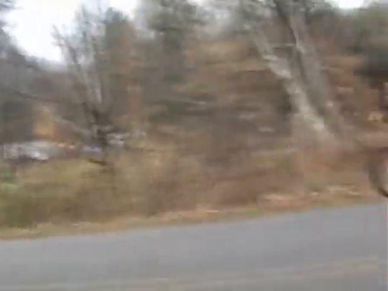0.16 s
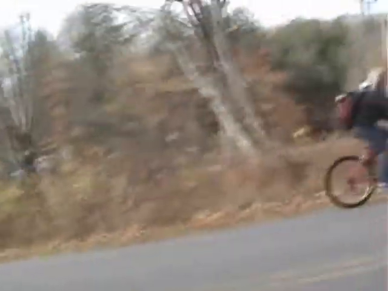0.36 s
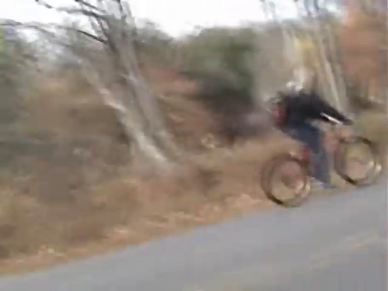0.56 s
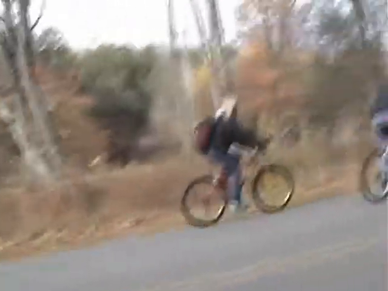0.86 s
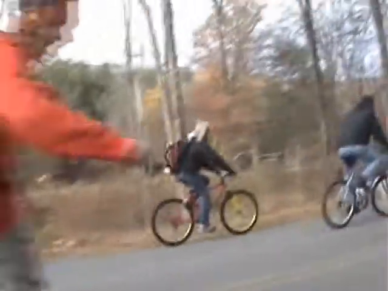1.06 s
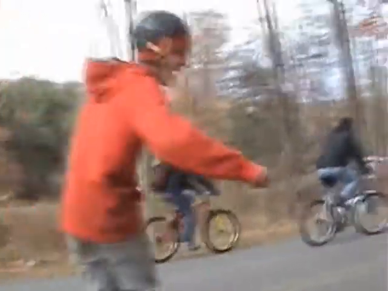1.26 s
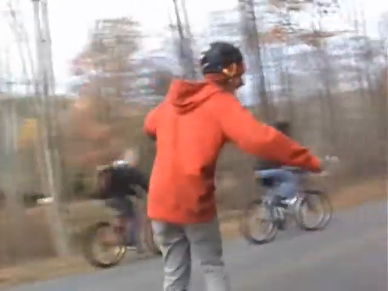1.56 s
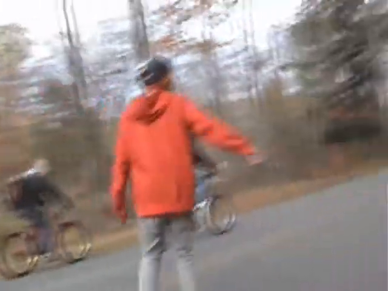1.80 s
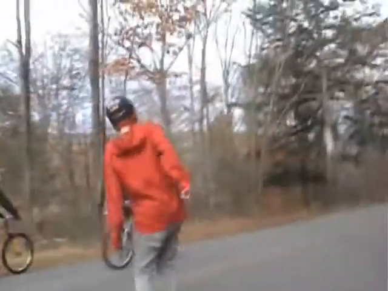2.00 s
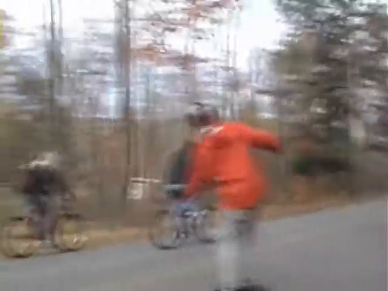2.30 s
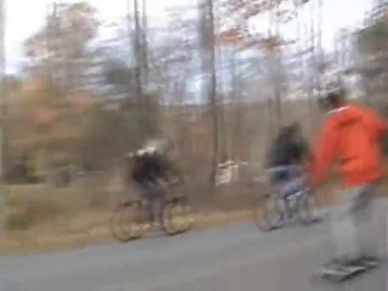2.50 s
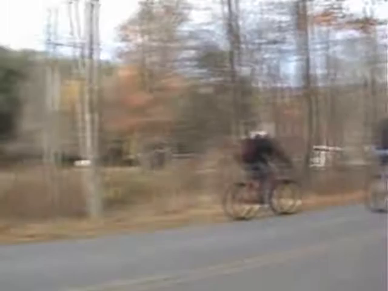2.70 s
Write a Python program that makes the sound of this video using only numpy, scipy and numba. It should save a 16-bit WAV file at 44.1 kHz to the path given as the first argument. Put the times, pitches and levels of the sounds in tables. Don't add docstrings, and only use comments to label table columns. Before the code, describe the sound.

A shoe sole drags and squeals roughly on asphalt as a longboard brakes, then wheels rumble on

```python
import sys
import numpy as np
from scipy import signal
from scipy.fft import rfft, irfft, next_fast_len
from scipy.io import wavfile
from scipy.ndimage import uniform_filter1d
from numba import njit

SR = 44100
rng = np.random.default_rng(int(sys.argv[2]) if len(sys.argv) > 2 else 0)


def voltage_ratio(level):
    return 10 ** (np.asarray(level, float) / 20)


def materialize(psi):
    bounded = np.clip(np.atleast_2d(psi).T, -1, 1)
    quanta = np.round(bounded * 32767).astype(np.int16)
    wavfile.write(sys.argv[1], SR, quanta)


N = 125685


def rms_one(x):
    return x / np.sqrt(np.mean(x ** 2) + 1e-20)


def in_time(rows):
    s, *columns = np.transpose(rows)
    return [np.interp(np.arange(N) / SR, s, c) for c in columns]


def at_hz(points, hz):
    point_hz, value = np.transpose(points)
    return np.interp(np.log(hz), np.log(np.maximum(point_hz, 1)), value)


def bump(s, length_s):
    return np.exp(-.5 * ((np.arange(N) / SR - s) / length_s) ** 2)


def drift(rate_hz):
    r = np.exp(-80 * np.pi * rate_hz / SR)
    noise = rng.standard_normal(N // 40 + 2002)
    slow = signal.lfilter([1], [1, -2 * r, r * r], noise)[2000:]
    return np.interp(np.arange(N) / 40, np.arange(len(slow)), rms_one(slow))


def band_pass(x, low_hz, high_hz, order=2):
    return signal.sosfilt(signal.butter(order, [low_hz, high_hz], "band", fs=SR, output="sos"), x)


@njit
def sweep(x, cosine, r):
    y = np.zeros(len(x))
    for i in range(2, len(x)):
        y[i] = x[i] - x[i - 2] + 2 * r * cosine[i] * y[i - 1] - r * r * y[i - 2]
    return y


def resonate(x, hz, width_hz):
    cosine = np.cos(2 * np.pi * hz / SR) * np.ones(N)
    r = np.exp(-np.pi * width_hz * 1.55 / SR)
    return rms_one(sweep(sweep(x, cosine, r), cosine, r))


def steady(x, share=.3):
    power = uniform_filter1d(x ** 2, size=200)
    return rms_one(x / (power + .05) ** (share / 2))


def ring(clicks, hz, t60_s):
    r, w = voltage_ratio(-60 / (t60_s * SR)), 2 * np.pi * hz / SR
    return signal.lfilter([0, np.sin(w)], [1, -2 * r * np.cos(w), r * r], clicks + 1e-18)


def grains(per_s, spread_db):
    sizes = voltage_ratio(spread_db * np.minimum(rng.exponential(1, N), 4)) * rng.choice([-1, 1], N)
    hits = rng.random(N) < per_s / SR
    return rms_one(sizes * hits) + .5 * rng.standard_normal(N)


def colour(x, spectrum, patchy_db, likeness=None):
    out, together = 0, drift(9.0)
    edges_hz = 25 * 2 ** np.arange(0, 9.6, .5)
    for k, (low_hz, high_hz) in enumerate(zip(edges_hz, edges_hz[1:])):
        band = band_pass(x[k % 2], low_hz, high_hz)
        hz = np.sqrt(low_hz * high_hz)
        if likeness:
            alike = at_hz(likeness, hz)
            band = np.sqrt(1 + alike) * band[0] + np.sqrt(1 - alike) * band[1] * [[1], [-1]]
        flicker_db = patchy_db * (together + 0.59 * drift(6.0))
        out = out + voltage_ratio(at_hz(spectrum, hz) + flicker_db) * band
    return rms_one(out)


SPREAD_DB, RIGHT_LAG_RAD = -21.5, 0.33


def place(x, pan_db):
    smear = voltage_ratio(SPREAD_DB) * (np.roll(x, 211) - np.roll(x, 367) + np.roll(x, 631))
    quadrature = signal.hilbert(x, next_fast_len(N))[:N].imag
    late = np.cos(RIGHT_LAG_RAD) * x + np.sin(RIGHT_LAG_RAD) * quadrature
    half_db = pan_db / 2 + np.zeros(N)
    return np.array([x + smear, late - smear]) * voltage_ratio([half_db, -half_db])


# hz, level_db_per_hz
AIR_SPECTRUM = [(15, -41), (25, -8), (216, -6), (246, -2.5), (514, -7), (687, -9.5), (804, -9.5),
                (3160, -16.5), (13400, -38)]
# hz, likeness_0_1
AIR_LIKENESS = [(25, 0.77), (60, 0.7), (240, 0.7), (950, 0.52), (3770, 0.41), (15000, 0.62)]
# hz, width_hz, level_db
DRONES = [(124.5, 10, -46.5), (185, 220, -55)]
# hz, width_hz, level_db
CHAIN = [(5100, 270, -60.5), (6600, 490, -58)]
AIR_DB, AIR_PATCHY_DB, CHAIN_PER_S = -37, 0.9, 79
MOTOR_HZ, MOTOR_DB, MOTOR_FROM_S = 248.4, -43, 2.06


def air():
    since_s = np.arange(N) / SR - MOTOR_FROM_S
    far = sum(voltage_ratio(db + 0.38 * drift(2.2)) * resonate(rng.standard_normal(N), hz, width_hz)
              for hz, width_hz, db in DRONES)
    motor = np.sqrt(2) * np.sin(2 * np.pi * np.cumsum(MOTOR_HZ + 0.7 * drift(4.4)) / SR)
    far += voltage_ratio(MOTOR_DB + 0.7 * drift(2.3)) * np.clip(since_s / 0.12, .15, 1) * motor
    ticks = (rng.random(N) < CHAIN_PER_S / SR) * rng.uniform(0.53, 1, N) + 1e-9
    chain = sum(voltage_ratio(db) * resonate(ticks, hz, width_hz) for hz, width_hz, db in CHAIN)
    far += chain * np.clip(since_s / 0.14, 0, 1)
    rush = colour(rng.standard_normal((2, 2, N)), AIR_SPECTRUM, AIR_PATCHY_DB, AIR_LIKENESS)
    return voltage_ratio(AIR_DB) * rush + place(far, 0.25)


# s, level_db
ROLL = [(0, -38.5), (.7, -30.5), (1.45, -33), (1.73, -32), (1.8, -28), (1.9, -35), (2.07, -33),
        (2.15, -40.5), (2.5, -42.5), (2.7, -42), (2.85, -38)]
# hz, level_db_per_hz
WHEEL_SPECTRUM = [(88, -43), (150, -0.5), (349, -7), (549, -6), (1540, -16.5), (1930, -15), (2420, -23.5),
                  (5440, -25), (13400, -39.5)]
# hz, width_hz, level_db
DECK = [(418, 238, -2.5), (675, 117, -9)]
ROLL_PAN_DB, TREBLE_HZ, TREBLE_SMOOTH_S = 2, 3000, .5


def wheels():
    db, = in_time(ROLL)
    out = colour([grains(2500, 4.6), grains(2500, 3.3)], WHEEL_SPECTRUM, patchy_db=2.0)
    treble = signal.sosfilt(signal.butter(2, TREBLE_HZ, "high", fs=SR, output="sos"), out)
    smooth_db = uniform_filter1d(db, size=int(TREBLE_SMOOTH_S * SR))
    out += treble * (voltage_ratio(smooth_db - db) - 1)
    out += sum(voltage_ratio(level_db + 0.5 * drift(9.1)) * resonate(grains(1500, 5.6), hz, width_hz)
               for hz, width_hz, level_db in DECK)
    return place(voltage_ratio(db) * out, ROLL_PAN_DB)


NOTE_STEADY = .7
# peak_s, level_db, length_s, pitch_hz, left_right_db
CHIRPS = [
    (1.64, -39, .012, 1920, 1),
    (1.683, -34, 0.0085, 1900, 1),
    (1.739, -39, .005, 1870, 0),
    (1.76, -36, 0.008, 1860, 0),
    (1.869, -38, 0.017, 2240, 0),
    (2.236, -47.5, 0.069, 2160, 11),
    (2.24, -47.5, 0.071, 1730, 10),
    (2.794, -45.5, 0.036, 1780, 8),
    (2.813, -45.5, 0.087, 2000, 14),
]
CHIRP_WIDTH_HZ = 170


def chirps():
    out = 0
    for s, level_db, length_s, hz, pan_db in CHIRPS:
        tone = steady(resonate(rng.standard_normal(N), hz, CHIRP_WIDTH_HZ), NOTE_STEADY)
        out = out + place(voltage_ratio(level_db + 2.1 * drift(30)) * bump(s, length_s) * tone, pan_db)
    return out


# s, peak_db
KNOCKS = [(1.753, -11.5), (1.775, -16), (1.782, -23), (1.792, -12), (1.808, -20.5), (1.822, -23),
          (1.836, -21), (1.846, -27), (2.497, -21.5), (2.651, -21), (2.82, -24)]
# hz, level_db, t60_s
KNOCK_MODES = [(313, -12, 0.081), (500, -8, 0.027), (665, 8, 0.031), (950, -14, 0.021), (1310, 1.5, 0.022),
               (2300, 2, 0.0076)]
KNOCK_DB, KNOCK_SPREAD_DB = -11, 1.5


def knocks():
    s, db = np.transpose(KNOCKS)
    out = np.zeros(N)
    chance_db = rng.normal(0, KNOCK_SPREAD_DB, (len(s), len(KNOCK_MODES)))
    for k, (hz, level_db, t60_s) in enumerate(KNOCK_MODES):
        clicks = np.zeros(N)
        clicks[(s * SR).astype(int)] = voltage_ratio(db + level_db + KNOCK_DB + chance_db[:, k])
        out += ring(clicks, hz, t60_s)
    return place(band_pass(out, 250, 2800), 1.2)


# s, peak_db, pitch_hz, left_right_db
STONES = [
    (1.563, -34, 8850, 3),
    (1.685, -26, 5000, 3),
    (1.686, -20.5, 3000, 7),
    (1.572, -22, 2300, 3),
    (1.756, -14, 5170, -3),
    (1.84, -21.5, 5050, -2),
    (2.012, -35, 3800, -2),
    (2.122, -10.5, 2700, 5.5),
    (2.585, -26, 4530, 12),
    (2.64, -30, 9000, -8),
]
STONE_CYCLES, SNAP_DB = 6.2, -14.5


def stones():
    out = 0
    noise = np.diff(uniform_filter1d(rng.standard_normal(N + 1), size=3)) * 2
    for s, db, hz, pan_db in STONES:
        click = np.zeros(N)
        click[int(s * SR)] = voltage_ratio(db)
        t60_s = STONE_CYCLES * 2 / hz
        ping = ring(click, hz, t60_s) + 0.27 * ring(click, min(1.9 * hz, 12000), t60_s)
        snap = voltage_ratio(db + SNAP_DB) * bump(s + 0.0017, 0.00032) * noise
        out = out + place(ping + snap, pan_db)
    return out


# s, level_db, length_s, coarse_share_0_1
GRIT = [(0.065, -26.5, 0.047, 0), (0.17, -28.5, .015, 0.13), (0.393, -29, .004, 0.8),
        (0.093, -24, .003, .6), (.514, -41, 0.0023, 0.3), (.742, -31, 0.0026, .5), (1.323, -28, .003, 0.5),
        (0.413, -21.5, 0.007, 0.73), (0.474, -36, 0.033, 1), (0.72, -32, 0.0071, 0.3),
        (0.829, -25.5, 0.004, 0.3), (0.958, -37, 0.025, 1), (1.005, -26.5, 0.0027, 0.8),
        (1.247, -31.5, 0.013, 0.03), (1.618, -35, 0.0055, 0.04), (1.758, -31, 0.0054, 0.04),
        (1.773, -33, .003, 0), (0.578, -38, 0.086, 0.92)]
# hz, level_db_per_hz
GRIT_SPECTRUM = [(600, -16), (2000, 13), (4500, -1), (7000, 4), (9000, -10.5), (12000, -15), (15000, -8.5)]
COARSE_HZ, COARSE_WIDTH_HZ = 3950, 1500


def grit():
    fine = colour([grains(3300, 3.4), grains(3100, 2.2)], GRIT_SPECTRUM, patchy_db=-0.5)
    coarse = resonate(grains(6000, 1.8), COARSE_HZ, COARSE_WIDTH_HZ)
    coarse = resonate(coarse, COARSE_HZ, COARSE_WIDTH_HZ)
    return sum(voltage_ratio(level_db) * bump(s, length_s) * (fine + share * (coarse - fine))
               for s, level_db, length_s, share in GRIT)


def sagging(s, level_db, length_s, hz, sag_hz_per_s, width_hz, share=None):
    since_s = np.clip(np.arange(N) / SR - s, -2 * length_s, 2 * length_s)
    tone = resonate(rng.standard_normal(N), hz - sag_hz_per_s * since_s, width_hz)
    if share is not None:
        tone = steady(tone, share)
    return voltage_ratio(level_db) * bump(s, length_s) * tone


# s, level_db, length_s, pitch_hz, sag_hz_per_s
STREAKS = [
    (0.982, -27.5, 0.049, 3000, 4200),
    (0.98, -37, 0.02, 2700, 1300),
    (1.26, -27, 0.14, 2505, 1050),
    (0.78, -26, .08, 1323, 300),
    (0.98, -27.5, 0.3, 1350, 1000),
    (1.414, -32.5, 0.065, 1180, 520),
]
STREAK_WIDTH_HZ = 230


def edge_streaks():
    return sum(sagging(*row, STREAK_WIDTH_HZ) for row in STREAKS)


# s, level_db, length_s, pitch_hz, sag_hz_per_s
HEEL_NOTES = [
    (.53, -29, 0.047, 945, 102),
    (0.674, -37, 0.028, 800, 100),
    (0.786, -28, 0.11, 743, 97),
    (0.767, -27, 0.024, 605, 300),
    (0.845, -29.5, 0.023, 517, 500),
    (1.0, -32, 0.031, 553, -300),
    (1, -31.5, 0.031, 510, 100),
    (1.23, -27.5, 0.056, 540, 300),
    (1.41, -30, 0.056, 670, 100),
    (1.345, -31.5, 0.069, 1040, 96),
]
NOTE_WIDTH_HZ = 45


def heel_notes():
    return sum(sagging(*row, NOTE_WIDTH_HZ, NOTE_STEADY) for row in HEEL_NOTES)


# s, level_db, squeal_hz, heel_hz, left_right_db, flat_0_1
DRAG = [
    (0, -18.5, 1870, 820, 6, 0),
    (.1, -16, 1727, 800, 5.5, 0.14),
    (.18, -18.5, 1693, 830, 5.5, 0.01),
    (.53, -17.5, 1608, 950, 5.5, 0.12),
    (.7, -20.5, 1467, 710, 4.5, 0.34),
    (.93, -17.5, 1583, 640, 3, 0.65),
    (1.2, -18, 1637, 500, 1, 0.91),
    (1.44, -17.5, 1424, 620, 0, 0.99),
    (1.53, -32, 1380, 600, 2, 1.0),
]
# s, depth_db, length_s
SKIPS = [
    (0.133, 1.5, 0.005),
    (0.27, -1, .015),
    (.37, 5, 0.0078),
    (0.46, 1, 0.0082),
    (0.624, 4, 0.005),
    (0.7, 2, 0.0081),
    (0.784, 1.5, 0.013),
]
# s, gain_db, length_s
BITES = [(0.026, 5.5, 0.0044), (0.053, 5, .004), (0.069, 6.5, 0.0033), (.1, 2, 0.011), (.175, 8, .004),
         (0.185, 12.5, 0.0038), (0.205, 10, 0.0052), (0.24, 10, 0.0055), (0.292, 8, 0.0086),
         (0.31, 8.5, .004), (0.326, 10.5, 0.0029), (0.347, 11, 0.0026), (0.4, 2, 0.0036),
         (0.413, 6, 0.0075), (0.435, 8, .004), (.46, 6.5, 0.0075), (.478, 5, .004), (0.498, 4, 0.0033),
         (0.516, 12.5, 0.0022), (0.533, 7, 0.0028), (0.563, -2, 0.0032), (0.58, 14, 0.0035),
         (0.597, 9.5, 0.0034), (0.642, 15, 0.0044), (0.656, 12.5, 0.0049), (0.727, 10, .008),
         (0.786, 8, 0.004), (0.811, 5, .005), (0.846, 5, 0.007), (0.872, 11, 0.0045), (0.898, -3, 0.0033),
         (.925, 8, 0.005), (0.965, 10, 0.0042), (1.06, 7.5, 0.0035), (1.097, 6, .005), (1.136, 5, .005),
         (1.18, 8, .005), (1.198, 13, 0.0045), (1.222, 13, 0.008), (1.265, 7.5, .005), (1.31, 8, 0.0043)]
# hz, width_hz, level_db, gain_when_flat_db
SOLE = [(2000, 486, -4, -8), (2536, 270, -9.5, -24), (2630, 1100, -15.5, 0.5), (554, 196, -21.5, 8.5),
        (9300, 2700, -46, 24.5)]
# hz, level_db_per_hz
SCRAPE_SPECTRUM = [(150, -35), (400, -6.5), (1000, -1), (2000, 1.5), (4000, -13), (7000, -25.5),
                   (11000, -26), (15000, -39)]
GRAINS_PER_S, SCRAPE_DB = 5000, -7.5
SQUEAL_DB, SQUEAL_FLAT_DB, SQUEAL_WIDTH_HZ, SQUEAL_STEADY, SQUEAL_WANDER = -6.5, -5.5, 85, .9, .006
HEEL_DB, HEEL_FLAT_DB, HEEL_WIDTH_HZ = -16.5, -5.5, 140
HISS_LOW_HZ, HISS_HIGH_HZ, HISS_DB = 13200, 15000, -28.5


def shoe():
    db, squeal_hz, heel_hz, pan_db, flat = in_time(DRAG)
    db = db - sum(depth_db * bump(s, length_s) for s, depth_db, length_s in SKIPS)
    db = db + 0.96 * drift(40) - 60 * (np.arange(N) > DRAG[-1][0] * SR)
    bite_db = sum(gain_db * bump(s, length_s) for s, gain_db, length_s in BITES)

    squeal_hz = squeal_hz * (1 + SQUEAL_WANDER * drift(20))
    squeal = steady(resonate(grains(GRAINS_PER_S, 3.9), squeal_hz, SQUEAL_WIDTH_HZ), SQUEAL_STEADY)
    out = voltage_ratio(SQUEAL_DB + SQUEAL_FLAT_DB * flat + bite_db) * squeal
    heel = steady(resonate(grains(GRAINS_PER_S, 1.5), heel_hz, HEEL_WIDTH_HZ))
    out += voltage_ratio(HEEL_DB + HEEL_FLAT_DB * flat + 2.3 * drift(33)) * heel
    for hz, width_hz, level_db, flat_db in SOLE:
        mode = resonate(grains(GRAINS_PER_S, 6.0), hz + 0.18 * width_hz * drift(4.1), width_hz)
        out += voltage_ratio(level_db + flat_db * flat + 0.5 * drift(8)) * mode
    scrape = [grains(GRAINS_PER_S, 1.0), grains(GRAINS_PER_S, 3.5)]
    out += voltage_ratio(SCRAPE_DB) * colour(scrape, SCRAPE_SPECTRUM, patchy_db=0.6)
    hiss = band_pass(grains(GRAINS_PER_S, 3.0), HISS_LOW_HZ, HISS_HIGH_HZ, order=3)
    out += voltage_ratio(HISS_DB) * rms_one(hiss)
    return place(voltage_ratio(db) * out + grit() + edge_streaks() + heel_notes(), pan_db)


FAR_CUT_HZ = 13950


def scene():
    far = air() + wheels() + chirps() + knocks()
    far = signal.sosfilt(signal.cheby2(12, 50, FAR_CUT_HZ, fs=SR, output="sos"), far)
    return far + stones() + shoe()


def low_pass(x):
    return signal.sosfilt(signal.butter(12, 15710, fs=SR, output="sos"), x)


# hz, side_gain_db
WIDTH = [(30, 4), (70, -15.5), (300, -1), (1000, -0.5), (4000, 1), (6500, 1), (8000, -2), (12000, -2.5),
         (14000, 2.5)]
MIC_CUT_HZ, TOP_DB = 14410, -41


def record(dry):
    size = next_fast_len(N + SR // 10)
    hz = np.maximum(np.arange(size // 2 + 1) * SR / size, 1)
    top_db = TOP_DB * np.clip((hz - MIC_CUT_HZ) / 300, 0, 1) - 60 * (hz > 15200)
    mid_side = [[1, 1.0], [1, -1.02]] @ np.tanh(dry)
    mid, side = rfft(mid_side, size) * voltage_ratio(top_db) / 2
    side = side * voltage_ratio(at_hz(WIDTH, hz))
    mix = irfft([mid + side, mid - side], size)[:, :N]
    return low_pass(mix)


dry = scene()
out = record(dry)
materialize(out)
```